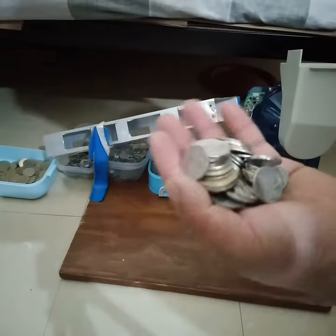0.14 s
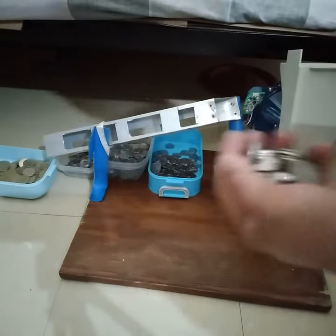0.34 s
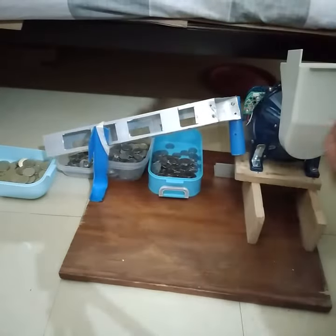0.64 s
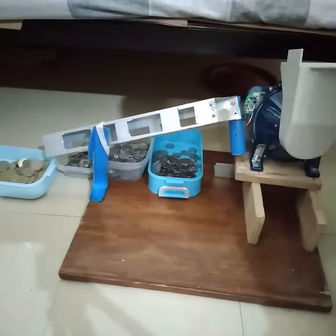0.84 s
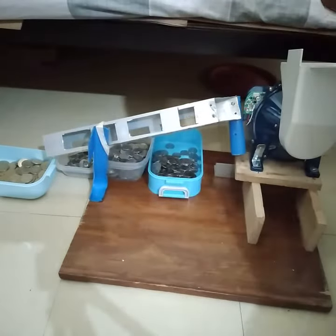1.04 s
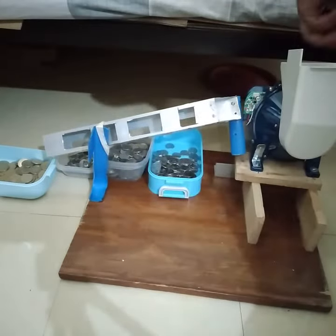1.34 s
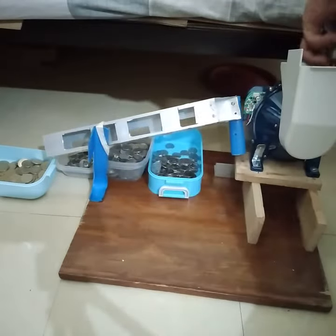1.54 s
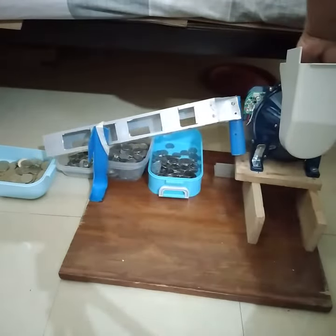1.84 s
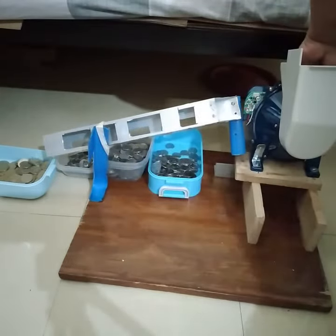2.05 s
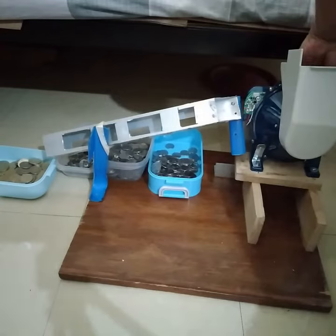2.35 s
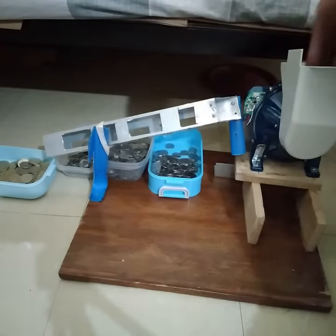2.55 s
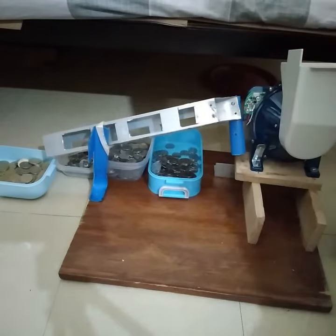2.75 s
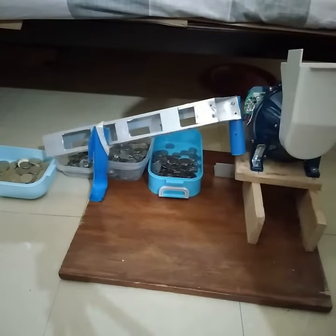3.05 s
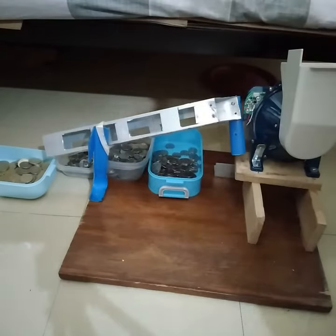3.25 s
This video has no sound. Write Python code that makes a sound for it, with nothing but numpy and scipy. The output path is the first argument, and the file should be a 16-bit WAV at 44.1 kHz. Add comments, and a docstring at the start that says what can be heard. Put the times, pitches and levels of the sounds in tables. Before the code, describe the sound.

A coin sorter's disc rattles and knocks in its plastic drum with a few clinks, then coins pour into the hopper in a dense, clipping metallic crash; close stereo microphone in a small tiled room.

```python
"""Coins pour into the hopper of a small coin sorter on a tiled floor: noisy contacts, crashes and damped rings.
Before that its disc rattles and knocks in a plastic drum, shaped by resonances, and a few coins scrape and clink.
The motor is a faint hum plus harmonics of a whine that grow as the coins load it.
In the two loudest surges filtered noise swells as a low rumble, mostly on the left; the baseline shifts slowly
and peaks clip. The disc and coins sound in a short room tail; the motor and the lows stay dry."""
import sys
import numpy as np
from scipy import signal
from scipy.fft import rfft, irfft, next_fast_len
from scipy.io import wavfile

SR = 44100
rng = np.random.default_rng(int(sys.argv[2]) if len(sys.argv) > 2 else 0)


def waveform_to_disk(signal):
    """Save audio, clipped to [-1, 1], as 16-bit WAV at the path in sys.argv[1]."""
    frames = np.transpose(np.atleast_2d(signal))
    scaled = np.clip(frames, -1, 1) * 32767
    samples = np.round(scaled).astype(np.int16)
    wavfile.write(sys.argv[1], SR, samples)


def makeup_ratio(level_db):
    """Linear amplitude ratio for a level in decibels (20 dB per factor of ten)."""
    decades = np.asarray(level_db, float) / 20
    return 10 ** decades


N = 149499  # length [samples]

# Disc and loose coins in the drum: (time [s], rattle level [dB], scrape level [dB])
RATTLE_LEVELS = [(0, -22.5, -32), (.15, -25, -34), (.35, -26.5, -35.5), (.52, -28, -30.5),
                 (.84, -26.5, -32), (.9, -50, -31), (1.0, -33, -36), (1.08, -29.5, -36), (1.45, -22, -33),
                 (1.58, -27.5, -34.5), (1.71, -21.5, -38), (1.76, -59, -37), (1.9, -40, -34)]
# Coins tumbling in the hopper: (time [s], clatter level [dB], wall knocking level [dB])
TUMBLE_LEVELS = [(1.91, -34, -65), (1.96, -22.5, -25.5), (2.14, -16.5, -17.5), (2.3, -16, -23),
                 (2.48, -20, -25.5), (2.56, -26, -30.5), (2.67, -21.5, -22), (2.76, -28, -30.5),
                 (2.82, -19, -26.5), (2.9, -24, -25), (2.98, -18.5, -21.5), (3.12, -19.5, -24.5),
                 (3.3, -19.5, -24), (3.39, -25.5, -57)]
# Resonances of the plastic drum: (frequency [Hz], width [Hz], level [dB])
DRUM_MODES = [(1030, 170, -13), (1350, 50, -8), (1612, 45, -3), (1815, 75, 0), (2030, 80, -9)]
# Resonances of the hopper walls: (frequency [Hz], width [Hz], level [dB])
HOPPER_MODES = [(643, 62, 8.5), (996, 140, -2), (1189, 156, 6), (1680, 150, -28)]
# Resonances of the coins: (frequency [Hz], width [Hz], level of the added power [dB])
COIN_MODES = [(4750, 1900, 0.46), (7590, 2500, 0.78), (10450, 290, 3.4), (13350, 360, 6.7),
              (14900, 390, 4.5)]
# Spectrum of coins clattering: (frequency [Hz], level [dB])
CLATTER_COLOUR = [(250, -10), (420, -6.5), (2000, 3), (6200, -3), (12000, -14), (15500, -22)]


def unit(x):
    """Scale to rms 1."""
    return x / np.sqrt(np.mean(x ** 2) + 1e-20)


def along(points, hz):
    """Interpolate (frequency [Hz], value) points on a log frequency axis."""
    f, v = np.transpose(points)
    return np.interp(np.log(hz + 1), np.log(f + 1), v)


def curves(rows, before_db, after_db):
    """Draw one gain per sample for each dB column, straight in dB between the rows."""
    s, *columns = np.transpose(rows)
    t = np.arange(N) / SR
    return [makeup_ratio(np.interp(t, s, column, before_db, after_db)) for column in columns]


def filtered(x, response):
    """Multiply the spectrum of x by a complex response of frequency."""
    m = next_fast_len(N + SR // 2)
    return irfft(rfft(x, m) * response(np.fft.rfftfreq(m, 1 / SR)), m)[..., :N]


def body(modes):
    """Response of a resonant body: causal bandpass modes summed with alternating sign."""
    def response(f):
        total = 0
        for k, (centre, width, db) in enumerate(modes):
            mode = 1j * f * width / (centre * centre - f * f + 1j * f * width)
            total = total + (-1) ** k * makeup_ratio(db) * mode
        return total
    return response


def colour(points):
    """Response with a smooth spectrum through (frequency [Hz], level [dB]) points."""
    return lambda f: makeup_ratio(along(points, f))


def metal(x, points):
    """Colour a broad clatter and lift the bands where coins resonate."""
    def response(f):
        lift = 1
        for centre, width, db in COIN_MODES:
            lift = lift + makeup_ratio(db) ** 2 / (1 + (2 * (f - centre) / width) ** 2)  # power
        return makeup_ratio(along(points, f)) * np.sqrt(lift)
    return filtered(x, response)


def scaled(shape, x):
    """Apply a filter with its gain set so that white noise keeps its level."""
    return shape(x) / np.std(shape(rng.standard_normal(N)))


def pair():
    """Two-channel white noise that is alike in the lows and independent in the treble."""
    # Likeness of left and right: (frequency [Hz], correlation [0-1])
    alike = [(300, 1), (1500, 0.57), (6000, 0)]

    def mid_side(f):
        turn = np.arccos(np.clip(along(alike, f), 0, 1)) / 2
        return np.array([np.cos(turn), np.sin(turn)])
    mid, side = filtered(rng.standard_normal((2, N)), mid_side)
    return np.array([mid + side, mid - side])


def contacts(rate, spread_db, t60, hiss):
    """Envelope of random contacts (rate per second) of uneven size, decaying in t60 [s], over a steady rub."""
    size_db = spread_db * np.minimum(rng.exponential(size=N), 2.5)
    hits = (rng.random(N) < rate / SR) * makeup_ratio(size_db)
    power_decay = makeup_ratio(-120 / (t60 * SR))  # power falls 60 dB in t60
    power = signal.lfilter([1], [1, -power_decay], hits ** 2)
    return unit(unit(np.sqrt(np.abs(power))) + hiss)


def jingle(own, **how):
    """Noise gated by contacts heard in all bands, mixed with contacts that each band has alone."""
    band_centres = [700, 1800, 4000, 8000, 14000]  # overlapping bands: (frequency [Hz])
    shared, noise = contacts(**how), pair()
    total = 0
    for k in range(len(band_centres)):
        hat = list(zip(band_centres, np.arange(len(band_centres)) == k))  # 1 at this centre, 0 at the others
        envelope = (1 - own) * shared + own * contacts(**how)
        total = total + filtered(noise * envelope, lambda f: along(hat, f))
    return total


def bursts(rows, t60, click):
    """A one-sample click and a decaying noise burst per impact: (time [s], level [dB])."""
    envelope, tick, t = np.zeros(N + SR), np.zeros(N), np.arange(SR // 4) / SR
    for s, db in rows:
        start = round(s * SR)
        onset = np.minimum(t / 0.00088, 1)  # rises in 0.88 ms
        envelope[start:][:len(t)] += makeup_ratio(db - 60 * t / t60) * onset
        tick[start] = click * makeup_ratio(db)
    return envelope[:N] * pair() + tick


def rings(s, hz, gain, cycles):
    """Damped sines that lose 60 dB in the given cycles, at another phase and size in each channel."""
    s, hz, gain = (np.asarray(v, float)[:, None] for v in (s, hz, gain))
    k = np.arange(1600)  # samples per ring
    turn = hz * k / SR  # cycles so far
    where = (np.round(s * SR).astype(int) + k).ravel()
    luck = rng.standard_normal((len(s), 4))
    onset = np.minimum(turn / 1.03, 1)  # rises in about one cycle
    sides = []
    for c in (0, 1):
        envelope = gain * makeup_ratio(2 * luck[:, [c]] - 60 * turn / cycles) * onset
        wave = envelope * np.sin(2 * np.pi * turn + 1.11 * luck[:, [c + 2]])
        sides.append(np.bincount(where, wave.ravel(), N + SR)[:N])
    return np.array(sides)


def chinks(modes, detune, spread_db, cycles, count):
    """Short rings at random times, of uneven size, scattered around the given resonances."""
    u, table = rng.random((count, 4)), np.array(modes, float)
    pick = table[(u[:, 1] * len(table)).astype(int)]
    hz = pick[:, 0] * np.exp(detune * (2 * u[:, 2] - 1))
    db = pick[:, -1] - spread_db * np.log(u[:, 3] + 0.065)
    return unit(rings(u[:, 0] * N / SR, hz, makeup_ratio(db), cycles))


def low_floor():
    """A steady bed of low-coloured noise."""
    # Spectrum of the bed: (frequency [Hz], level [dB])
    floor_colour = [(15, -0.5), (40, -11), (200, -13), (400, -25.5)]
    return makeup_ratio(-48) * unit(filtered(pair(), colour(floor_colour)))


def low_rumble():
    """Low noise with a lumpy envelope swells twice, stronger on the left."""
    # Swells: (time [s], level [dB])
    swells = [(2.0, -57), (2.06, -38.5), (2.3, -27), (2.5, -51), (2.86, -51.5), (3.01, -37), (3.04, -26.5),
              (3.31, -30.5), (3.37, -47)]
    # Spectrum of the rumble: (frequency [Hz], level [dB])
    rumble_colour = [(15, 0), (40, -10), (400, -10), (900, -12), (1500, -26.5)]
    level, = curves(swells, -101, -52)
    a, b = (unit(filtered(rng.standard_normal(N), colour(rumble_colour))) for _ in range(2))
    lumps = contacts(rate=70, spread_db=2, t60=0.06, hiss=1.2)
    left, right = makeup_ratio(11) * a, makeup_ratio(1.5) * (0.35 * a + b)
    return level * lumps * np.array([left, right])


def baseline_shifts():
    """Slow bell-shaped offsets push the waveform off centre."""
    # Offsets: (centre time [s], bell width [s], left size [amplitude], right size [amplitude])
    offsets = [(2.35, .07, .1, .015), (3.06, .017, -.3, -.15), (3.18, .055, .16, -.01),
               (3.3, .035, .11, -.01)]
    t = np.arange(N) / SR
    return sum(np.outer([l, r], np.exp(-0.5 * ((t - s) / w) ** 2)) for s, w, l, r in offsets)


def motor():
    """A steady faint hum, and harmonics of one pitch that grow as the motor is loaded; their phases wander."""
    # Whine at full load: (multiple of the pitch [-], level [dB])
    whine_partials = [(1, -39), (2, -44), (3, -34), (4, -40), (5, -34)]
    # Hum: (frequency [Hz], level [dB])
    hum_partials = [(332, -58), (640, -47.5)]
    whine_hz, load_from_s, load_rise_s, unloaded_db = 409.1, 2.2, 0.3, -12
    t = np.arange(N) / SR
    drift = np.cumsum(rng.standard_normal((2, N)), 1) * [[0.001], [0.012]]  # radians
    phase = 2 * np.pi * whine_hz * t + drift[0]
    whine = sum(makeup_ratio(db) * np.sin(k * phase) for k, db in whine_partials)
    hum = sum(makeup_ratio(db) * np.sin(2 * np.pi * hz * t + drift[1]) for hz, db in hum_partials)
    load = np.clip((t - load_from_s) / load_rise_s, makeup_ratio(unloaded_db), 1)
    return hum + whine * load


def disc_rattle():
    """The disc rattles: contact noise through the drum's resonances, plus short rings near them."""
    level, _ = curves(RATTLE_LEVELS, 0, -36)
    noise = pair() * contacts(rate=160, spread_db=3, t60=0.035, hiss=0.3)
    rattle = makeup_ratio(-8) * unit(filtered(noise, body(DRUM_MODES)))
    ringing = makeup_ratio(-6) * chinks(DRUM_MODES[1:], detune=0.02, spread_db=3, cycles=50, count=500)
    return level * (rattle + ringing)


def coin_scrape():
    """Loose coins scrape along and chink in the treble."""
    # Spectrum of the scrape: (frequency [Hz], level [dB])
    scrape_colour = [(200, -46), (400, -17.5), (1000, -13.5), (1800, -4.5), (2700, -12.5), (11000, -30),
                     (15500, -43)]
    _, level = curves(RATTLE_LEVELS, 0, -35.5)
    noise = jingle(own=0.72, rate=220, spread_db=8, t60=0.042, hiss=0.74)
    scrape = makeup_ratio(4.5) * unit(metal(noise, scrape_colour))
    chink_modes = [(COIN_MODES[0][0], 0), (COIN_MODES[1][0], -6)]
    ringing = makeup_ratio(-5) * chinks(chink_modes, detune=0.07, spread_db=2, cycles=110, count=400)
    return level * (scrape + ringing)


def disc_knocks():
    """The disc knocks on the drum, and coins clink and ring with each knock."""
    # Knocks, before the layer trims: (time [s], level [dB], clink level over the knock [dB])
    knock_hits = [(0.0185, -8.5, -33), (0.1405, -19.5, -0.5), (0.5062, -11, -11.5), (0.5427, -23, 6),
                  (0.5794, -8, -13.5), (0.6383, -1.5, -16), (0.7187, -3, -16), (0.7526, -1, -14),
                  (0.7878, -25, 9), (0.815, -22, 7), (0.9343, -3.5, -12), (0.97, -7.5, -19),
                  (0.982, -10, -26), (1.03, -27, 3.5), (1.438, -6.5, -18.5), (1.467, -9.5, -12),
                  (1.6417, -7.5, -13.5), (1.6884, -4.5, -19.5)]
    s, db, rel = np.transpose(knock_hits)
    knocks = scaled(lambda x: filtered(x, body(DRUM_MODES)), bursts(zip(s, db - 15), 0.078, click=12.2))
    clinks = scaled(lambda x: metal(x, CLATTER_COLOUR), bursts(zip(s, db + rel - 3), 0.094, click=2.5))
    # Three coin rings per knock, close in pitch
    ring_hz = COIN_MODES[0][0] * np.exp(0.04 * rng.standard_normal((len(s), 3))).ravel()
    ring_gain = makeup_ratio(np.repeat(db + rel, 3) - 11)
    return knocks + clinks + rings(np.repeat(s, 3), ring_hz, ring_gain, cycles=130)


def hopper_walls():
    """Coins knock the hopper walls: contact noise through their resonances, plus short rings near them."""
    _, level = curves(TUMBLE_LEVELS, -90, -24)
    noise = pair() * contacts(rate=250, spread_db=4.5, t60=0.039, hiss=0.2)
    walls = makeup_ratio(-10) * unit(filtered(noise, body(HOPPER_MODES)))
    ringing = makeup_ratio(-4) * chinks(HOPPER_MODES[1:], detune=0.12, spread_db=2.5, cycles=18, count=500)
    return level * (walls + ringing)


def coin_tumble():
    """Coins tumble over each other: metallic contact noise and many short rings of widely scattered pitch."""
    level, _ = curves(TUMBLE_LEVELS, -90, -24)
    noise = jingle(own=0.7, rate=300, spread_db=4, t60=0.012, hiss=0.25)
    clatter = unit(metal(noise, CLATTER_COLOUR))
    clink_hz = 3078  # middle pitch
    ringing = makeup_ratio(-1) * chinks([(clink_hz, 0)], detune=0.6, spread_db=3, cycles=45, count=1200)
    return level * (clatter + ringing)


def coin_drops():
    """Coins land in the hopper: a metallic crash and one damped ring of the wall for each."""
    # Landings, before the crash trim: (time [s], level [dB], ring level over the crash [dB], ring frequency [Hz])
    landings = [(1.784, -8.5, -24, 1950), (1.908, -6.5, -34, 1670), (1.945, -14, 2.5, 1027),
                (2.037, -5.5, -2, 3730), (2.077, -16.5, 9, 1400), (2.11, -18, 11.5, 950),
                (2.179, -12.5, 1.5, 1057), (2.419, -7.5, -2, 1680), (2.479, -12.5, 6.5, 1940),
                (2.662, -12, -8, 2280), (2.724, -16, 8.5, 3420), (2.799, -7.5, -2, 2540),
                (2.965, -6.5, 3, 3300), (2.985, -22, 6, 1950), (3.022, -12.5, 3.5, 902)]
    s, db, rel, hz = np.transpose(landings)
    crash = scaled(lambda x: metal(x, CLATTER_COLOUR), bursts(zip(s, db - 9.5), 0.18, click=2.7))
    return crash + rings(s, hz, makeup_ratio(db + rel), cycles=55)


def room(x):
    """Direct sound, slightly later on the right, and a noise tail drawn anew for every step."""
    # Decay of the tail: (frequency [Hz], time to fall 60 dB [s])
    decay_times = [(500, 0.26), (10000, 0.19)]
    # Left minus right: (frequency [Hz], level [dB])
    balance = [(300, 0), (5500, 1.5), (7500, 14), (10000, -17), (14000, -4)]
    tail_db, lag_s = -2, 0.00006
    wet, step = np.zeros((2, N + SR)), 2048  # step in samples
    for at in range(0, N, step):
        hz, t, z = signal.stft(rng.standard_normal((2, SR // 4)), SR, nperseg=256)
        decay = makeup_ratio(-60 * t / along(decay_times, hz)[:, None])
        tail = signal.istft(z * decay, SR, nperseg=256)[1]
        piece = signal.fftconvolve(x[:, at:at + step], tail / np.linalg.norm(tail[0]), axes=1)
        wet[:, at + 90:][:, :piece.shape[1]] += piece  # the tail starts 90 samples (2 ms) late
    direct = filtered(x, lambda f: np.exp(np.outer([1j, -1j], np.pi * f * lag_s)))
    mix = direct + makeup_ratio(tail_db) * wet[:, :N]
    return filtered(mix, lambda f: makeup_ratio(np.outer([0.5, -0.5], along(balance, f))))


def scene():
    """Disc and coins in the room, with the motor and the low layers dry."""
    disc = disc_rattle() + coin_scrape() + disc_knocks()
    pour = hopper_walls() + coin_tumble() + coin_drops()
    lows = low_floor() + low_rumble() + baseline_shifts()
    return room(disc + pour) + motor() + lows


def roll_off(x):
    """The treble ends steeply here."""
    return signal.sosfilt(signal.butter(12, 15650, fs=SR, output="sos"), x)


def record(dry):
    """Peaks clip with a slightly rounded knee."""
    ceiling = 1.05
    clipped = dry / (1 + np.abs(dry / ceiling) ** 6) ** (1 / 6)
    return roll_off(clipped)


dry = scene()
out = record(dry)
waveform_to_disk(out)
```